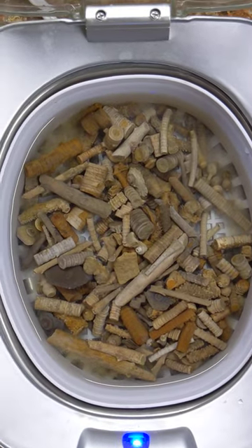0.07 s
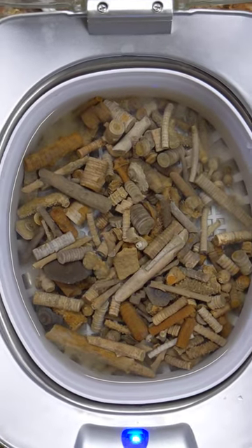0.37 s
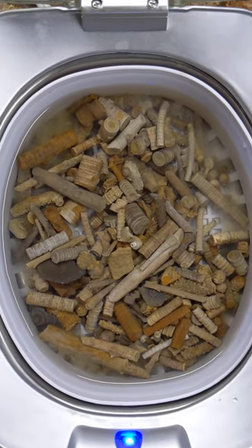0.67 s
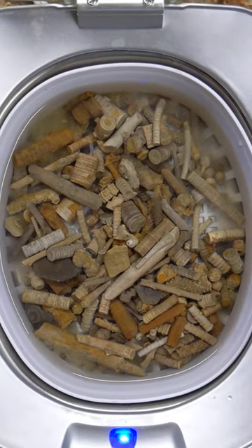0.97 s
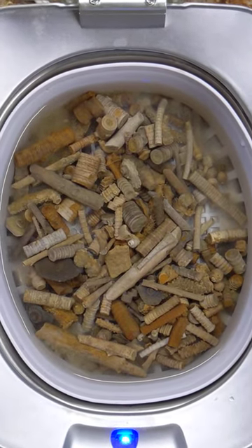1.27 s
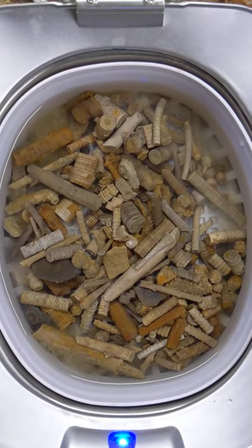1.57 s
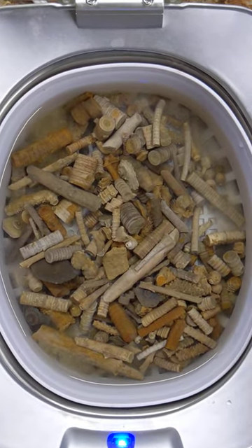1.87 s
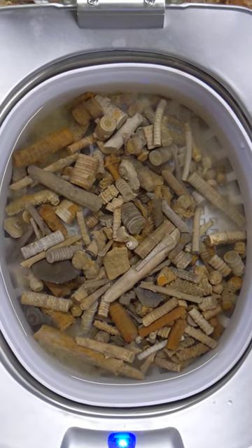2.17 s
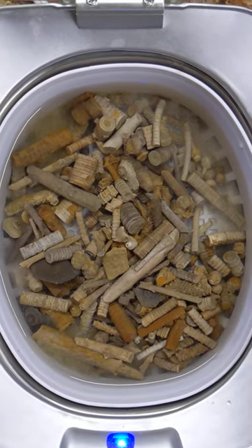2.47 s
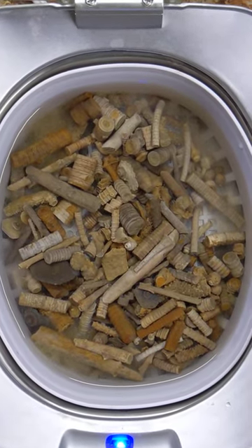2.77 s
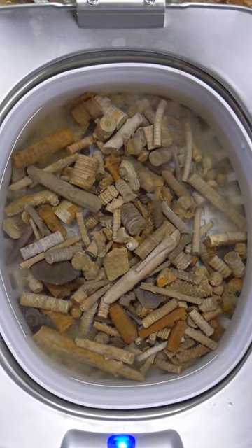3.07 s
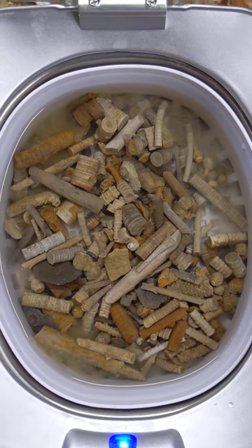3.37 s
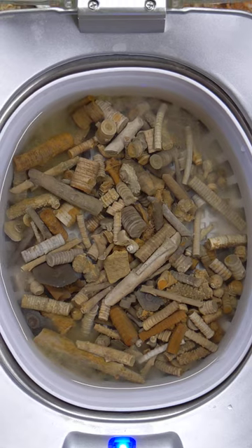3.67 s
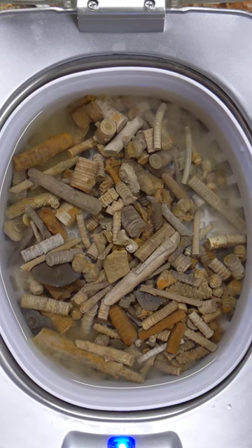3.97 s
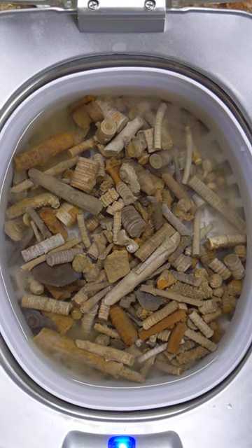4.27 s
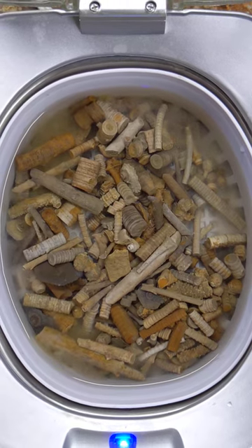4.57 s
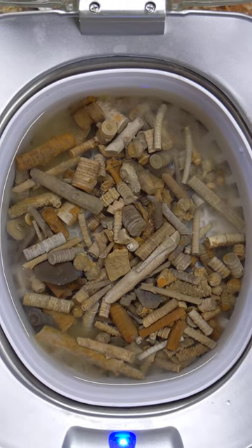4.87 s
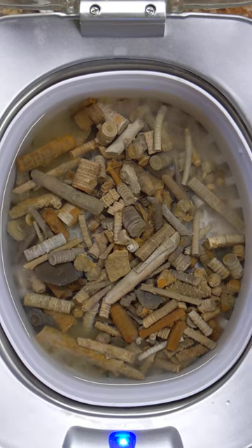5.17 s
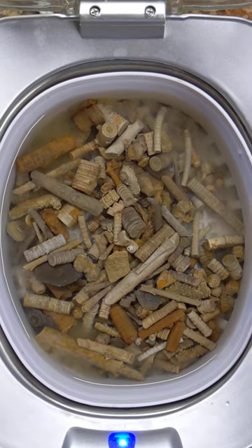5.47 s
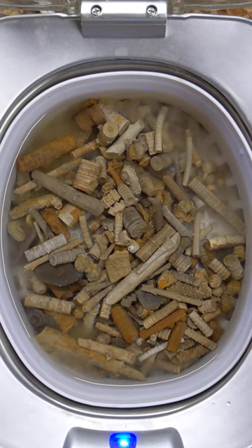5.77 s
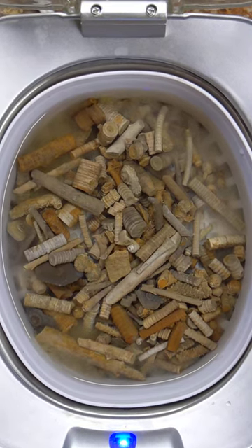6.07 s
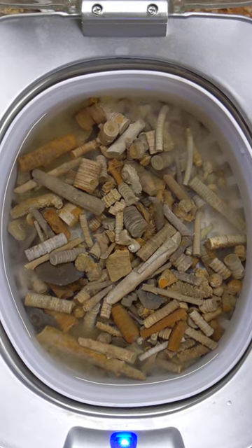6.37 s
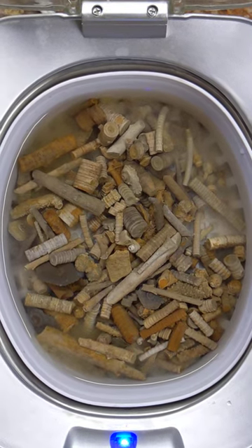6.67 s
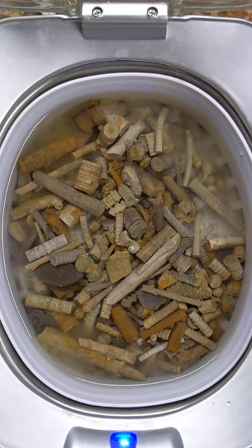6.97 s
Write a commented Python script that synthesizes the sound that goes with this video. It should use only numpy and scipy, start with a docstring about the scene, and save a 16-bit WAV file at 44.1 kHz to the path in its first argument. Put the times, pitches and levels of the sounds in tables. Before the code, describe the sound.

A small ultrasonic cleaner runs for the whole seven seconds, heard from a hand-held stereo microphone just above its water-filled steel tank. A nasal electrical buzz sits mostly on the left, wavering in tone; it is strongest until about 2.5 seconds, sinks to its weakest around 4, and partly returns after 4.5. Above it the tank gives a bright metallic rasp and a thin, high, throbbing whine that slowly grows louder. A fine hiss of tiny bubbles pulses at the same rapid rate as the buzz, with brief sizzling flares near 1.3, 2.3, 4 and 6.3 seconds. Short, sharp microphone pops with a soft thump land on one side or the other: near 0.2 and 0.5 seconds, at 2.7 and 3.1, in a cluster from 3.5 to 4.4, then at 6.2, 6.4 and 7. Soft room air and a faint rumble lie behind.

```python
"""A nasal buzz and a pulsing hiss: a small ultrasonic cleaner with a basket of fossils in water,
heard from a hand-held stereo pair just above the tank. The drive bursts twice per mains cycle, so
the steel rasps and whines and cavitation hisses in the same rhythm. The microphones rectify the
ultrasound to a low buzz that shifts as they move through its standing waves, and now and then
one channel pops. Soft room air lies behind."""
import sys
import numpy as np
from scipy import signal
from scipy.fft import rfft, irfft, next_fast_len
from scipy.io import wavfile

SR = 44100
rng = np.random.default_rng(int(sys.argv[2]) if len(sys.argv) > 2 else 0)


def inscribe(sig):
    """Save sig as 16-bit PCM at rate SR to the path in sys.argv[1].

    A 1-D sig is mono; a 2-D sig holds one channel per row.
    Samples are clipped to [-1, 1] before scaling.
    """
    pcm = np.round(np.clip(np.atleast_2d(sig).T, -1, 1) * 32767)
    wavfile.write(sys.argv[1], SR, pcm.astype(np.int16))


N = 309582
TIME = np.arange(N) / SR

BURST_HZ, TOP_HZ = 119.945, 15750
CYCLE = BURST_HZ * TIME  # drive cycles elapsed, one burst in each
WALL_HARMONIC = 44  # falls on the tank wall's strongest mode


def undb(db):
    """Decibels to gain."""
    return 10 ** (np.asarray(db) / 20)


def resonance(hz, centre_hz, width_hz):
    """Bell-shaped gain: 1 at the centre, a half at width_hz to either side."""
    return 1 / (1 + ((hz - centre_hz) / width_hz) ** 2)


def curves(table):
    """The columns of a table, joined by straight lines in time."""
    times, *columns = np.transpose(table)
    return [np.interp(TIME, times, column) for column in columns]


def colour(spectrum, hz, side=0):
    """Gain of a spectrum table at the given frequencies; side 0 is left, 1 is right."""
    points = np.array(spectrum, float)
    return undb(np.interp(np.log(np.maximum(hz, 1)), np.log(points[:, 0]), points[:, 1 + side]))


def noise(gain):
    """Noise whose amplitude per root hertz is gain(hz)."""
    size = next_fast_len(N, real=True)
    hz = np.arange(size // 2 + 1) * SR / size
    return irfft(rfft(rng.standard_normal(size)) * gain(hz), size)[:N] * np.sqrt(SR / 2)


def walk(rate_hz):
    """A smooth random wander of spread 1 that takes rate_hz steps a second."""
    steps = rng.standard_normal(4096)
    coarse = TIME[::16]
    whole, part = np.divmod(coarse * rate_hz, 1)
    index = whole.astype(int) % (len(steps) - 1)
    angle = np.pi / 2 * part
    return np.interp(TIME, coarse, steps[index] * np.cos(angle) + steps[index + 1] * np.sin(angle))


def beat(crest):
    """A cosine at the burst rate that peaks at the fraction `crest` of each cycle."""
    return np.cos(2 * np.pi * (CYCLE - crest))


def rectified_buzz(hum_db, drone_db, rasp_db, drone_hz, rasp_hz, null_hz,
                   drone_width_hz, rasp_width_hz, roughness, hum_lag, chirp_lag):
    """Bursts rectified in a microphone: a round hum and a short upward chirp; lags are in cycles."""

    def band(orders, centre_hz, width_hz, sweep_cycles=0.016):
        """Harmonics that waver in level and timing as the microphone moves; higher ones come later."""
        pitches = orders * BURST_HZ
        gains = [resonance(hz, centre_hz, width_hz) * undb(2.1 * walk(4.255) + 1.6 * walk(22))
                 for hz in pitches]
        wave = 0
        for k, hz, gain in zip(orders, pitches, gains):
            turns = k * (CYCLE - chirp_lag) - sweep_cycles * k * k / 2 + 0.04 * walk(2)
            notch = 1 - 0.81 * resonance(hz, null_hz, width_hz=34)  # standing waves cancel this band
            wave += gain * notch * np.cos(2 * np.pi * turns)
        return wave / np.sqrt(sum(gain ** 2 for gain in gains))

    drone = undb(drone_db) * band(np.arange(2, 5), drone_hz, drone_width_hz)
    rasp = undb(rasp_db) * band(np.arange(5, 17), rasp_hz, rasp_width_hz)
    burst_strength = 1 + roughness * walk(BURST_HZ)
    hum = undb(hum_db) * beat(hum_lag) * (1 + 0.14 * walk(33))
    return hum + burst_strength * (drone + rasp)


def left_buzz():
    """Left microphone, close over the tank: a strong, nasal buzz coloured by the standing waves."""
    # The microphone drifts out of the strong ultrasound after 2.5 s and partly back in after 4.5 s:
    # time_s, hum_db, drone_db, rasp_db, drone_hz, rasp_hz, rasp_half_width_hz, null_hz
    strong_field = [(0.0, -29, -36.5, -34, 280, 440, 360, 447),
                    (0.09, -30.5, -37, -36.5, 328, 470, 470, 330),
                    (0.25, -34.5, -30.5, -32, 474, 780, 240, 690),
                    (0.45, -33.5, -38.5, -33.5, 220, 735, 390, 726),
                    (0.62, -29, -31, -35, 360, 710, 450, 714), (0.76, -32, -38, -27.5, 180, 524, 490, 434),
                    (0.92, -29, -35.5, -31, 315, 560, 345, 406),
                    (1.08, -30, -32.5, -29.5, 317, 480, 425, 415),
                    (1.3, -27, -29.5, -28, 353, 480, 454, 385), (1.42, -27.5, -29, -31, 330, 440, 372, 440),
                    (1.54, -28, -35.5, -35.5, 323, 490, 410, 860),
                    (1.7, -26.5, -34, -31, 283, 704, 260, 930), (1.95, -30.5, -33, -38, 318, 580, 443, 880),
                    (2.2, -31, -33.5, -33.5, 280, 480, 310, 720),
                    (2.45, -31, -35.5, -35, 308, 440, 340, 420),
                    (2.75, -37.5, -34, -40.5, 295, 640, 560, 375),
                    (3.05, -41.5, -38.5, -41.5, 244, 1060, 383, 376),
                    (3.35, -39, -38.5, -40.5, 258, 1060, 330, 373),
                    (3.7, -55, -41, -44.5, 160, 795, 380, 440), (4.05, -51, -40, -45, 160, 840, 328, 990),
                    (4.42, -62, -40, -44, 160, 830, 239, 950), (4.6, -45, -36.5, -33, 380, 660, 290, 580),
                    (4.76, -44, -35.5, -43.5, 394, 750, 360, 760),
                    (5.0, -40, -38.5, -35, 363, 790, 210, 460), (5.25, -42, -44, -41.5, 280, 970, 220, 537),
                    (5.6, -43, -44, -42, 280, 970, 150, 600), (6.0, -40.5, -40, -38.5, 263, 950, 280, 536),
                    (6.5, -41.5, -42, -37.5, 230, 860, 251, 627),
                    (6.8, -42.5, -41.5, -44, 308, 990, 130, 406),
                    (7.02, -42, -41.5, -54, 330, 970, 220, 425)]
    hum_db, drone_db, rasp_db, drone_hz, rasp_hz, rasp_width_hz, null_hz = curves(strong_field)
    return rectified_buzz(hum_db, drone_db, rasp_db, drone_hz, rasp_hz, null_hz,
                          drone_width_hz=100, rasp_width_hz=rasp_width_hz,
                          roughness=0.12, hum_lag=0.44, chirp_lag=0.2156)


def right_buzz():
    """Right microphone, in weak ultrasound throughout: a faint, broad buzz."""
    # Buzz levels along the microphone's path: time_s, hum_db, rasp_db
    weak_field = [(0, -49, -54), (.25, -45, -45), (.6, -56, -53.5), (2.4, -58, -50.5), (2.95, -48, -47),
                  (3.9, -63, -49), (5.1, -49, -55), (7.02, -53.5, -58)]
    hum_db, rasp_db = curves(weak_field)
    return rectified_buzz(hum_db, drone_db=-51, rasp_db=rasp_db, drone_hz=280, rasp_hz=890, null_hz=860,
                          drone_width_hz=350, rasp_width_hz=940,
                          roughness=0.62, hum_lag=0.52, chirp_lag=0.3478)


def build_and_settle(top_db, rise_db_per_s, fall_db_per_s, busiest_s=1.8):
    """Level in dB of a bubble sound that grows until the clouds are busiest and then thins out."""
    return top_db - np.maximum(rise_db_per_s * (busiest_s - TIME), fall_db_per_s * (TIME - busiest_s))


def cavitation(crossover_hz=7000, right_sizzle_db=-11):
    """Bubble clouds collapse during every burst; narrow resonances sizzle and flare in the hiss."""
    # Spectrum of the bubble hiss: frequency_hz, left_relative_db, right_relative_db
    hiss = [(2850, -100, -100), (4260, -78, -83), (4560, -74.5, -77.5), (5980, -78, -77.5),
            (7250, -82, -81), (7750, -77.5, -79), (9500, -76, -76), (11470, -77, -79.5),
            (12400, -81.5, -79), (13300, -79, -75.5), (14400, -79, -87), (15500, -75.5, -91)]
    # Resonances that sizzle in the hiss: centre_hz, half_width_hz, relative_db
    sizzles = [(10620, 150, -1), (11450, 440, 2.5)]
    # A bubble cloud flares up in the lower resonance: peak_s, half_length_s, relative_db
    flares = [(1.263, 0.0081, -37.5), (1.63, .04, -56), (2.262, 0.029, -45), (3.61, 0.059, -48),
              (3.978, 0.013, -37), (6.263, .025, -42), (6.41, 0.033, -40)]
    fizz_db = build_and_settle(top_db=0.72, rise_db_per_s=0.5, fall_db_per_s=0.35)
    sizzle_db = build_and_settle(top_db=-42.5, rise_db_per_s=1.4, fall_db_per_s=0.99)
    pulse_db = 3 * beat(crest=0.12) + 0.5 * walk(70)
    flare = sum(undb(db) * np.exp(-((TIME - peak_s) / half_s) ** 2) for peak_s, half_s, db in flares)
    fine_share = lambda hz: 1 / (1 + (crossover_hz / (hz + 1)) ** 8)
    out = []
    for side, side_db in enumerate((0, right_sizzle_db)):
        fine = noise(lambda hz: colour(hiss, hz, side) * np.sqrt(fine_share(hz))) * undb(fizz_db)
        coarse = noise(lambda hz: colour(hiss, hz, side) * np.sqrt(1 - fine_share(hz)))
        for k, (centre_hz, width_hz, db) in enumerate(sizzles):
            ringing = noise(lambda hz: resonance(hz, centre_hz, width_hz))
            strength = undb(db + sizzle_db) + flare * (k == 0)
            fine += ringing / ringing.std() * strength * undb(side_db)
        # the finest bubbles follow the drive closely; the tank smears the lower hiss
        fine *= undb(pulse_db + 0.52 * walk(400))
        coarse *= undb(-2.5 + 0.5 * beat(crest=0.82))
        out.append(fine + coarse)
    return np.array(out)


def tank_rasp(level_db=-3.5, flutter_db=1.42, right_lag_s=0.00021, size=4096):
    """Each burst ends in a snap that kicks the steel tank; its partials answer as one rasping pulse."""
    # Low partials at which the casing hums along: pitch_hz, left_relative_db, right_relative_db
    casing = [(480, -45, -64), (600, -59, -51.5), (720, -61, -50), (1080, -52.5, -66), (1320, -57.5, -84),
              (1440, -54.5, -84), (1560, -57, -55), (1800, -52, -60)]
    # Partials that fall on a tank resonance: pitch_hz, left_relative_db, right_relative_db
    peaks = [(4078, -50.5, -55.5), (4198, -57.5, -59.5), (4318, -55, -63), (4438, -58, -59),
             (4558, -65, -59), (4678, -65, -54), (4798, -57, -52), (5038, -58, -61), (5158, -55.5, -61),
             (5278, -70, -70), (5398, -65, -63), (5517, -58, -61), (5637, -52, -56.5), (5757, -56.5, -53),
             (5877, -60, -54.5), (5997, -67, -59), (6237, -57, -61), (6357, -67, -60), (6477, -58, -59),
             (6837, -57, -67)]
    # Outline of all other tank partials: frequency_hz, left_relative_db, right_relative_db
    body = [(2010, -68, -60.5), (2450, -57, -64), (3400, -61.5, -64), (3740, -61.5, -58), (4930, -77, -49),
            (6100, -55, -49.5), (7800, -59.5, -69), (9200, -58.5, -72), (11700, -70, -95),
            (13000, -58, -62), (15700, -64, -68)]
    hz = np.arange(size // 2 + 1) * BURST_HZ
    kick_cycles, mean_delay_cycles = 0.6, 0.12
    turns = np.cumsum(kick_cycles + mean_delay_cycles * rng.exponential(size=len(hz)))
    turns -= turns[WALL_HARMONIC]  # in step with the wall's strongest mode
    out = []
    for side in range(2):
        gain = colour(body, hz, side) * (hz > 1950) * (hz < TOP_HZ)
        for peak_hz, *db in [*casing, *peaks]:
            gain[round(peak_hz / BURST_HZ)] = undb(db[side])
        echo_turns = 0.11 * rng.standard_normal(len(hz))  # each microphone has echoes of its own
        arrival_turns = turns + hz * right_lag_s * side + echo_turns
        pulse = irfft(gain * np.exp(-2j * np.pi * arrival_turns)) * size / np.sqrt(2)
        out.append(np.interp(CYCLE % 1, np.arange(size) / size, pulse, period=1))
    return np.array(out) * undb(level_db + flutter_db * walk(80))


def wall_whine(noisy_share=0.14, growth_db_per_s=0.85, throb_db=7):
    """Every burst pumps the wall's strongest mode into a throbbing whine; collapsing bubbles roughen it."""
    ring_hz = WALL_HARMONIC * BURST_HZ
    throb = undb(throb_db * beat(crest=0.92))
    throb /= np.sqrt(np.mean(throb ** 2))
    out = []
    for start_db, lag_turns in ((-50, 0), (-52.5, 0.21)):  # left, right
        driven = np.sqrt(2 * (1 - noisy_share)) * np.cos(2 * np.pi * (ring_hz * TIME - lag_turns))
        stirred = noise(lambda hz: resonance(hz, ring_hz, width_hz=130))
        stirred *= np.sqrt(noisy_share) / stirred.std()
        out.append((driven + stirred) * throb * undb(start_db + growth_db_per_s * TIME))
    return np.array(out)


def microphone_pops(spike_ms=0.43, step_share=0.54, level_db=-5.5):
    """A microphone's bias jumps: a sharp spike on a step, which the coupling filter swings back to 0."""
    # Bias jumps: start_s, channel (0 left, 1 right), signed_relative_height, decay_ms
    jumps = [(.1593, 1, 0.8, 60), (0.4588, 1, -0.25, 7.6), (0.461, 1, -0.56, 60), (2.7432, 1, 0.38, 10),
             (2.759, 1, 0.15, 4), (3.1203, 1, 0.86, 68), (3.52, 1, 0.19, 1.4), (3.755, 1, 0.73, 60),
             (3.7575, 0, -0.63, 7), (3.8173, 0, 0.85, 90), (4.0457, 1, 0.25, 1.8), (4.0876, 1, -0.69, 44),
             (4.437, 0, -0.37, 14), (6.2132, 0, -0.87, 90), (6.412, 1, -0.22, 3.5), (6.4389, 1, -0.54, 60),
             (6.9843, 0, 0.29, 7.3)]
    out = np.zeros((2, N))
    for start_s, channel, height, decay_ms in jumps:
        start = int(start_s * SR)
        ms = 1000 * TIME[:N - start]
        step = step_share * np.exp(-ms / decay_ms)
        spike = (1 - step_share) * np.exp(-ms / spike_ms)
        out[channel, start:] += height * (step + spike)
    coupling = signal.butter(2, 25, "high", fs=SR, output="sos")
    soft_edge = signal.butter(2, 5200, fs=SR, output="sos")
    return undb(level_db) * signal.sosfilt(soft_edge, signal.sosfilt(coupling, out))


def room_tone(crossover_hz=70):
    """The room behind the cleaner: soft, steady air over a rumble that swells slightly."""
    # Spectrum of the room: frequency_hz, density_db (per hertz)
    spectrum = [(10, -82), (25, -64), (60, -73), (180, -83.5), (500, -81), (1000, -85.5), (2000, -92.5),
                (3200, -91.5), (8000, -105)]
    low_share = lambda hz: 1 / (1 + (hz / crossover_hz) ** 4)
    rumble = [noise(lambda hz: colour(spectrum, hz) * np.sqrt(low_share(hz))) for _ in range(2)]
    air = [noise(lambda hz: colour(spectrum, hz) * np.sqrt(1 - low_share(hz))) for _ in range(2)]
    return np.array(rumble) * undb(0.5 * walk(2.3)) + np.array(air)


def scene():
    """The cleaner in its room, from two microphones just above the water."""
    buzz = np.array([left_buzz(), right_buzz()])
    return buzz + cavitation() + tank_rasp() + wall_whine() + microphone_pops() + room_tone()


def record(dry):
    """The recorder cuts the treble steeply above TOP_HZ."""
    return signal.sosfilt(signal.ellip(12, 0.1, 80, TOP_HZ, fs=SR, output="sos"), dry)


dry = scene()
out = record(dry)
inscribe(out)
```